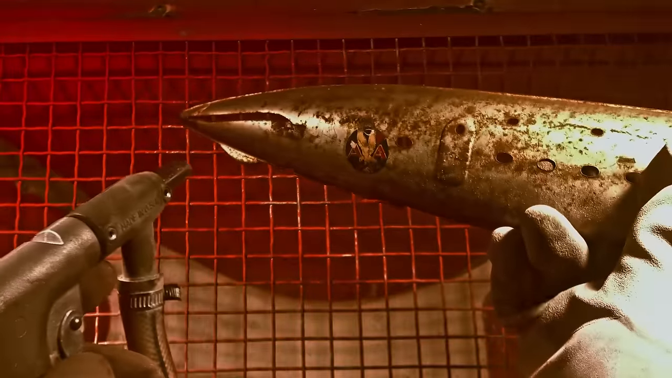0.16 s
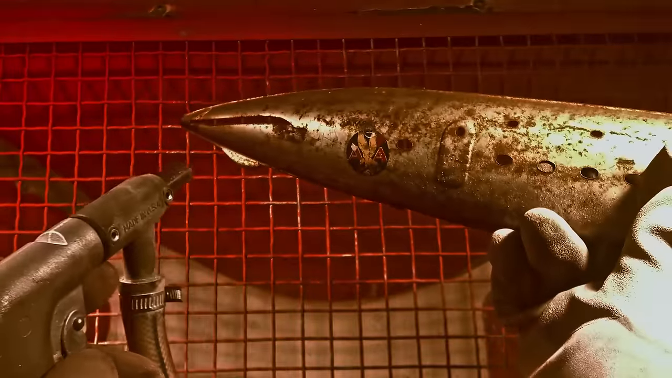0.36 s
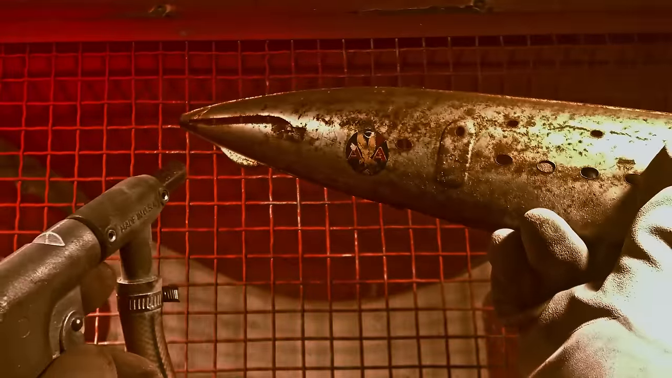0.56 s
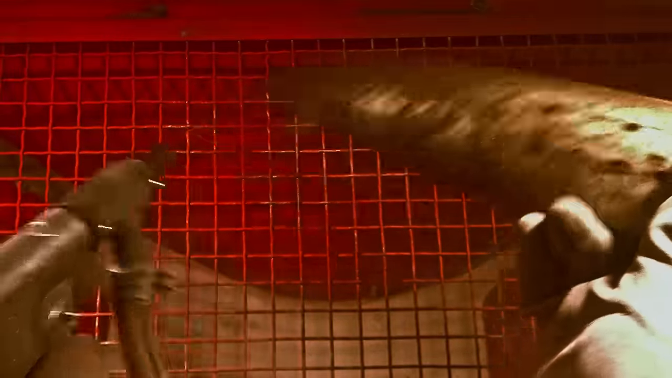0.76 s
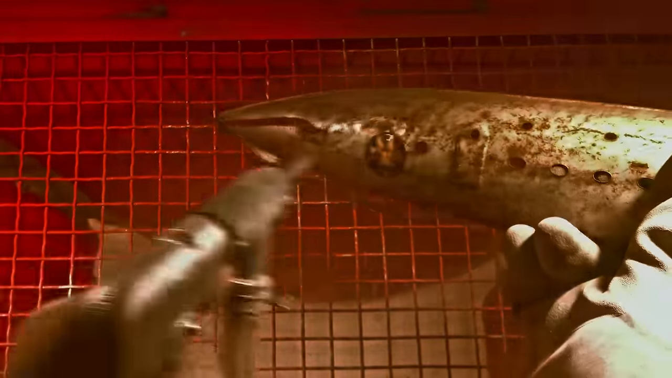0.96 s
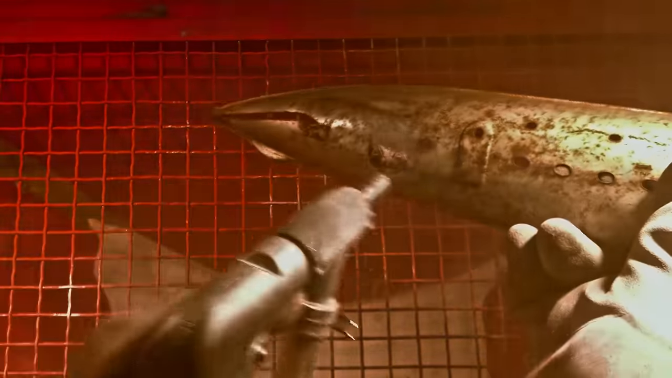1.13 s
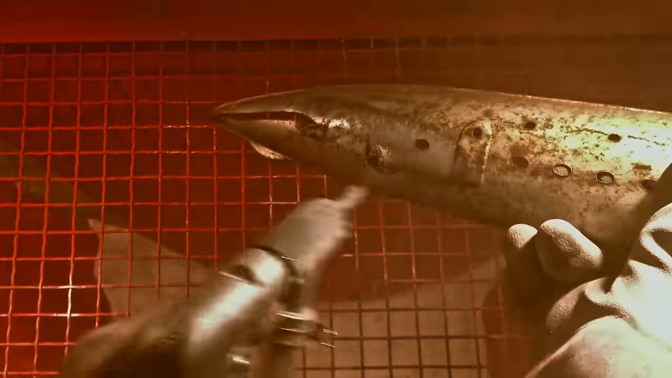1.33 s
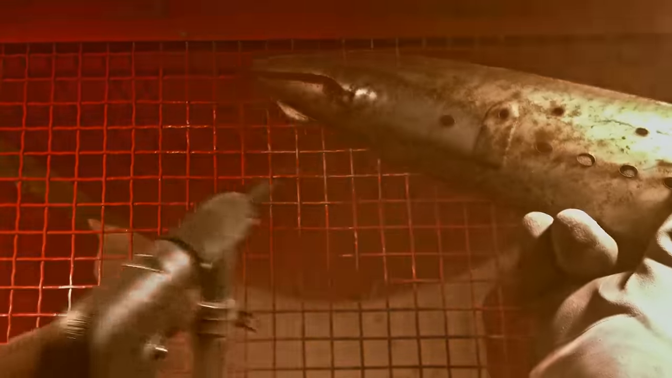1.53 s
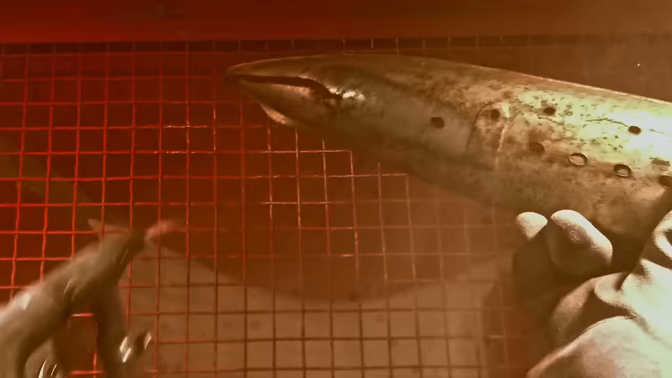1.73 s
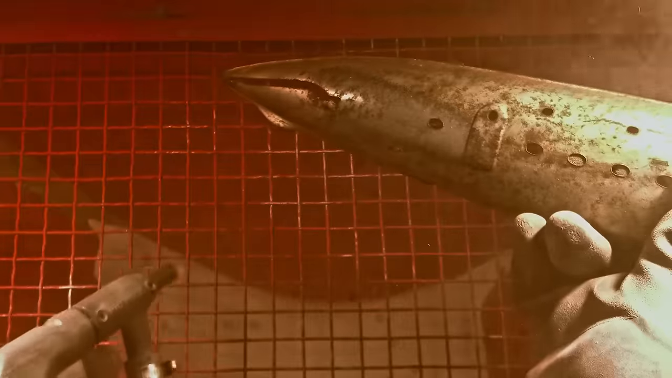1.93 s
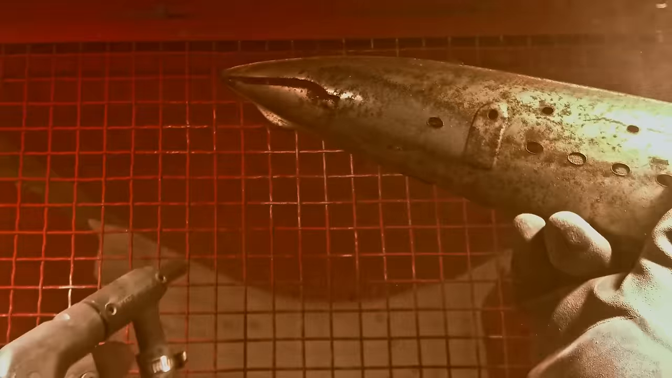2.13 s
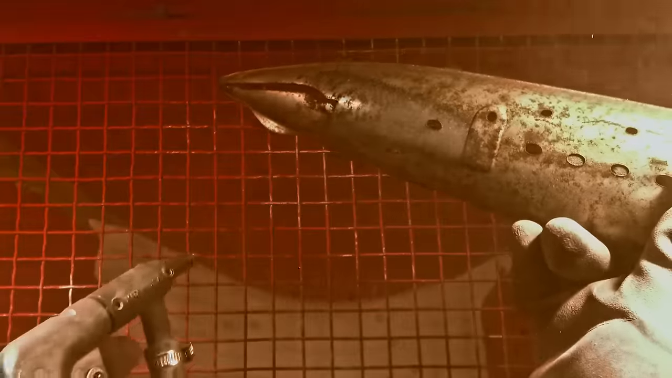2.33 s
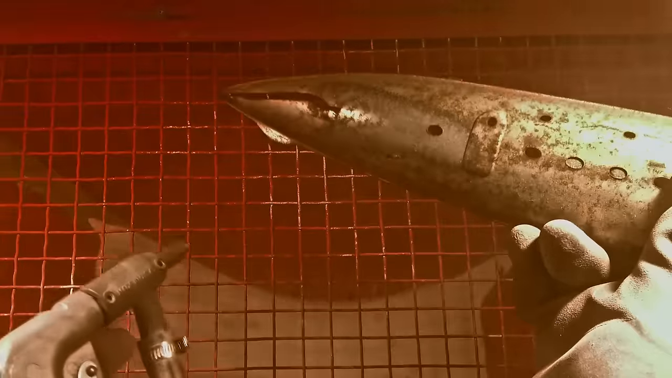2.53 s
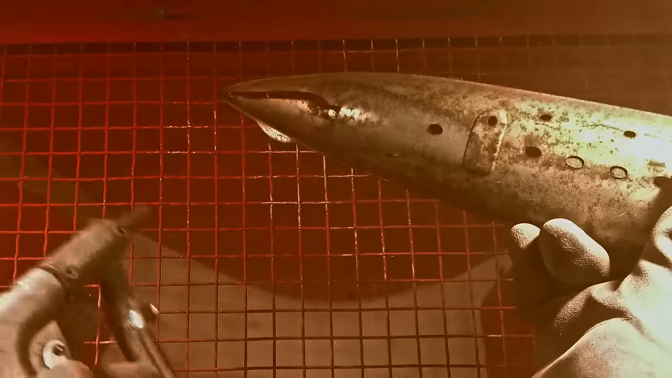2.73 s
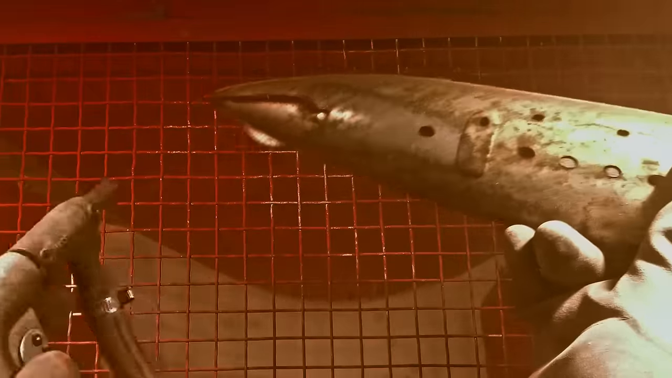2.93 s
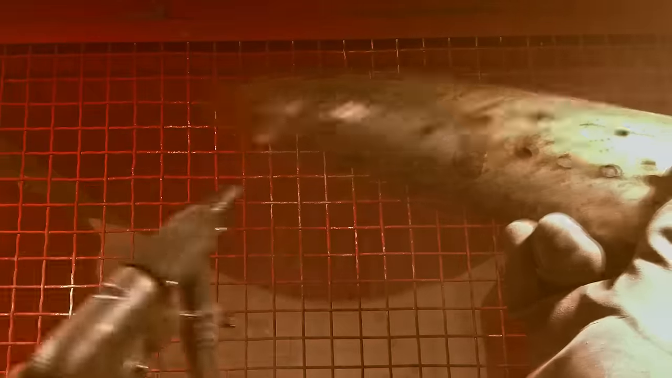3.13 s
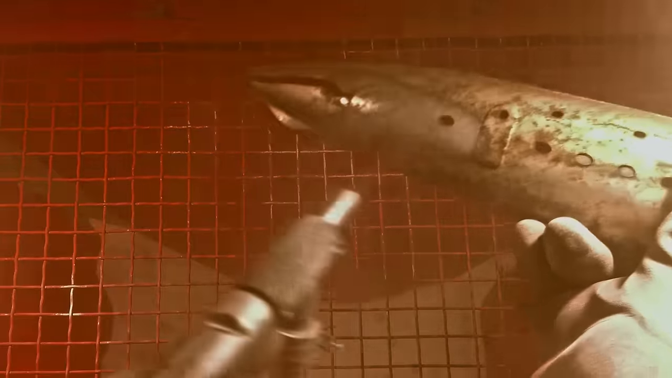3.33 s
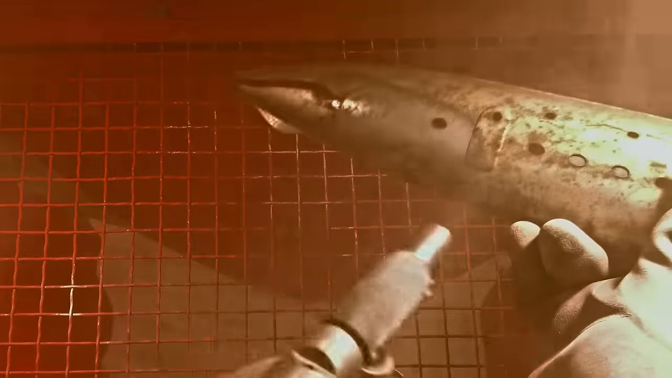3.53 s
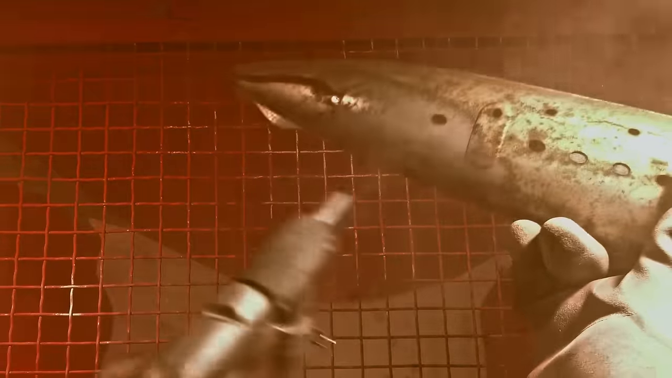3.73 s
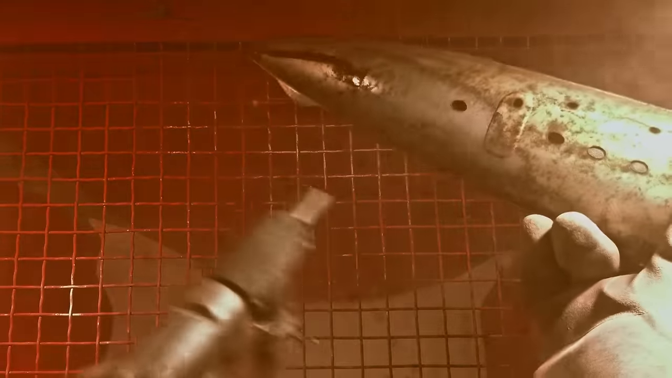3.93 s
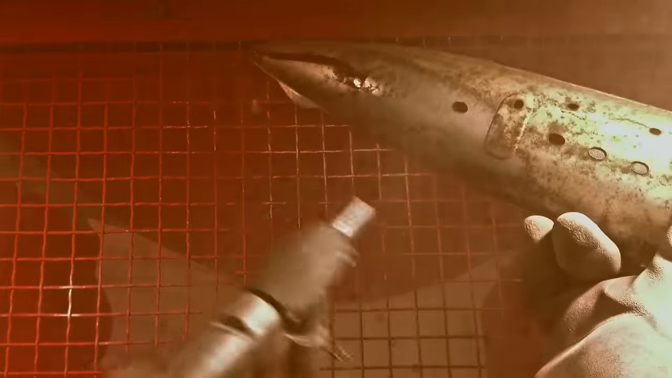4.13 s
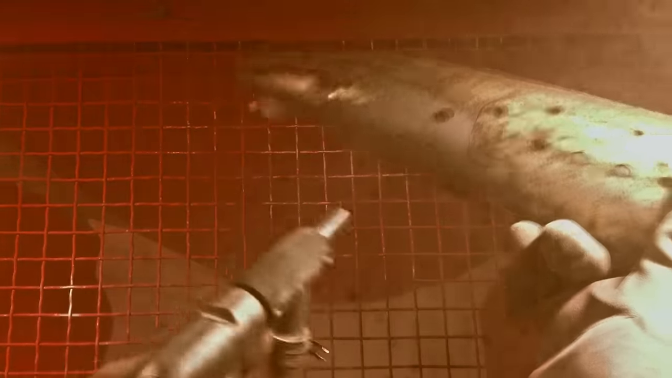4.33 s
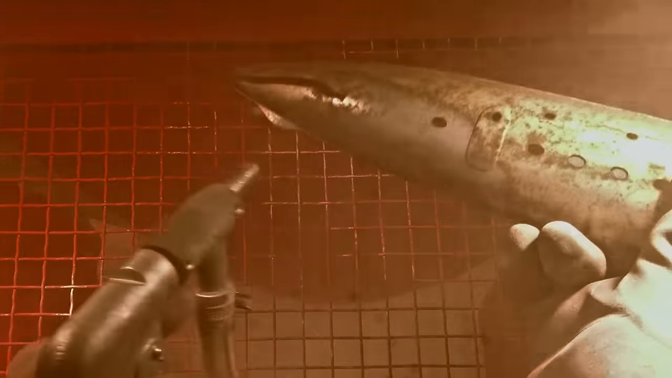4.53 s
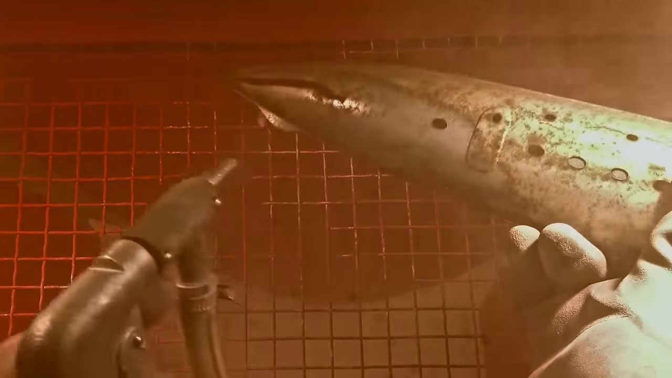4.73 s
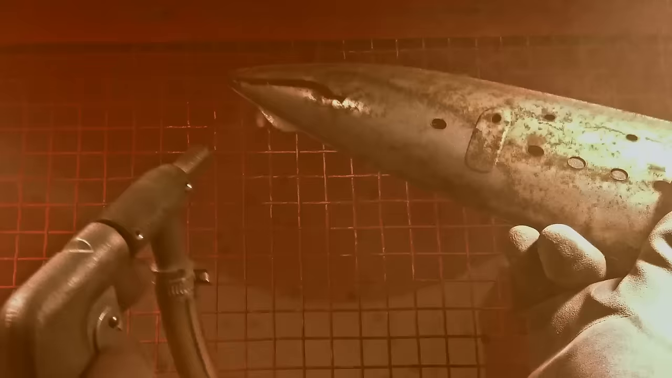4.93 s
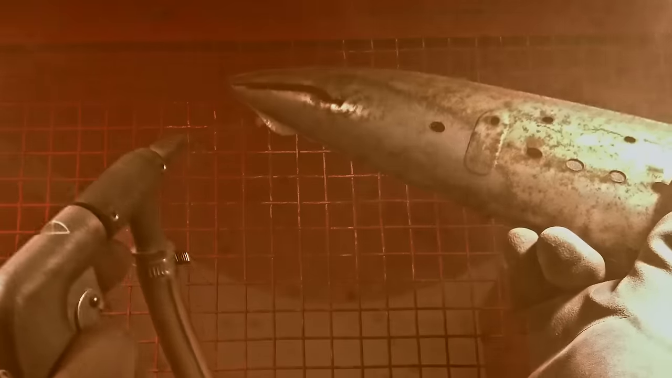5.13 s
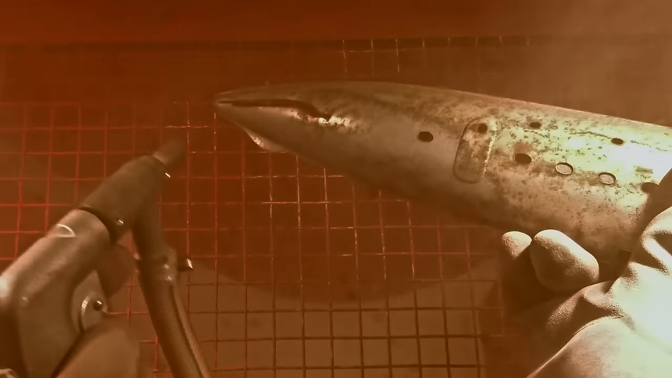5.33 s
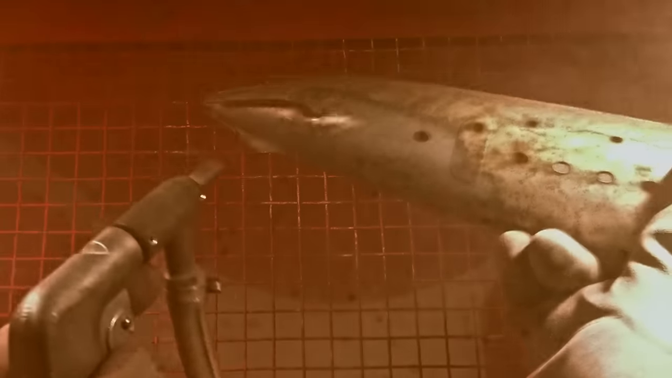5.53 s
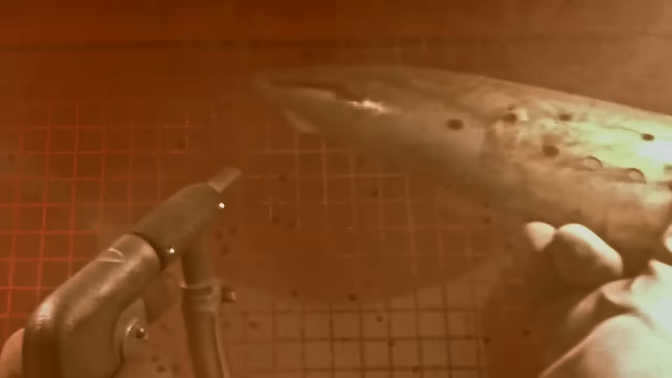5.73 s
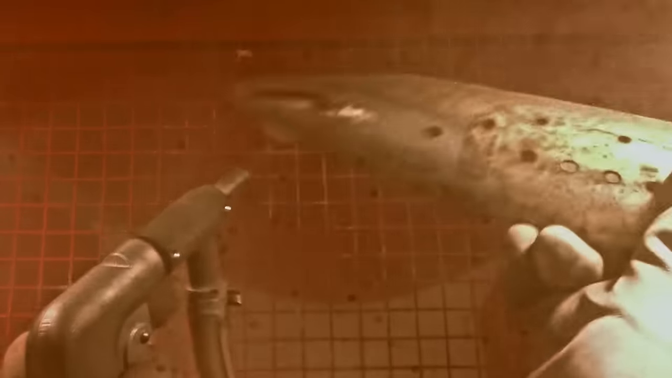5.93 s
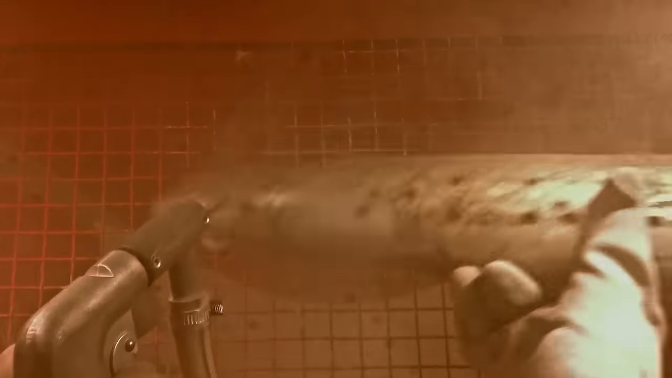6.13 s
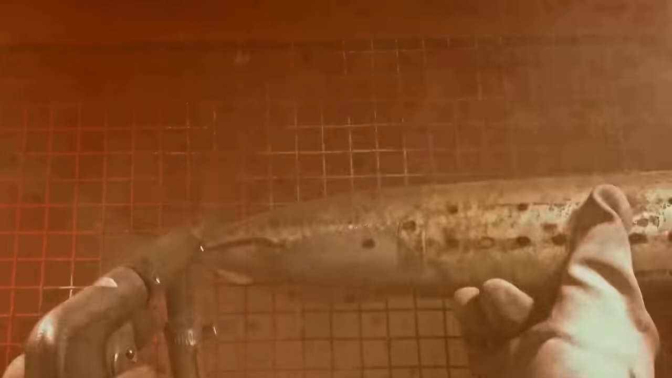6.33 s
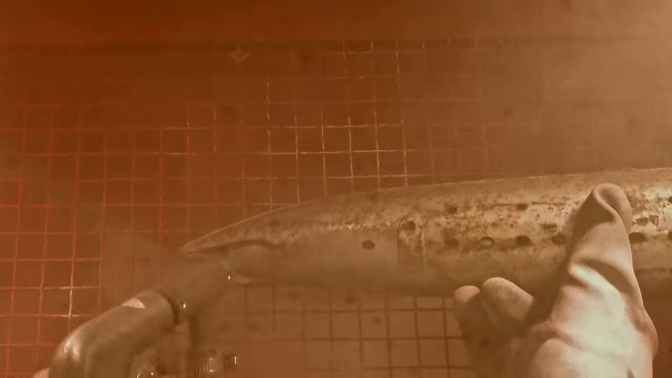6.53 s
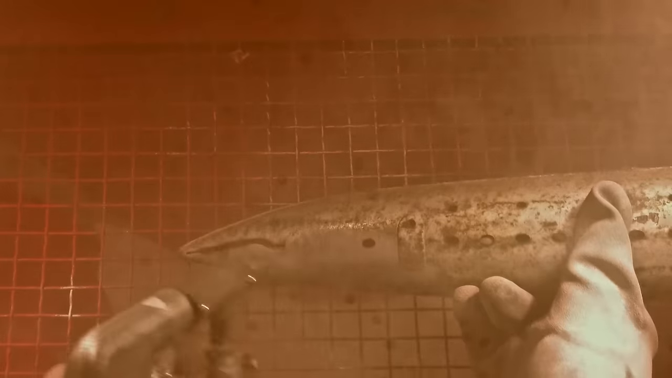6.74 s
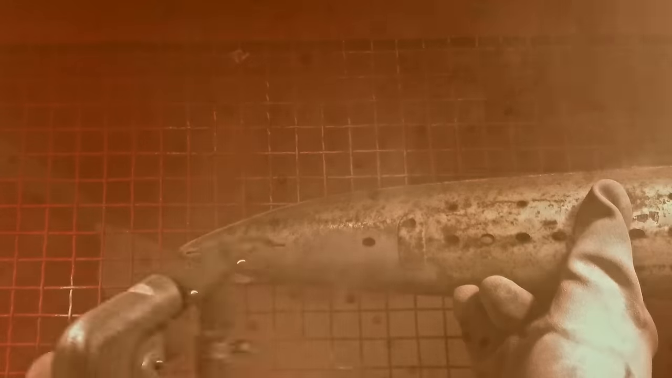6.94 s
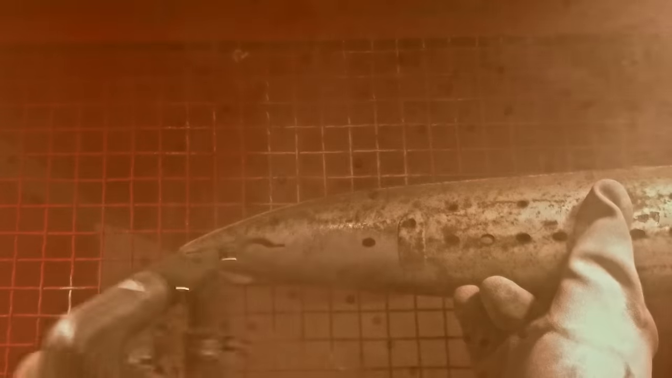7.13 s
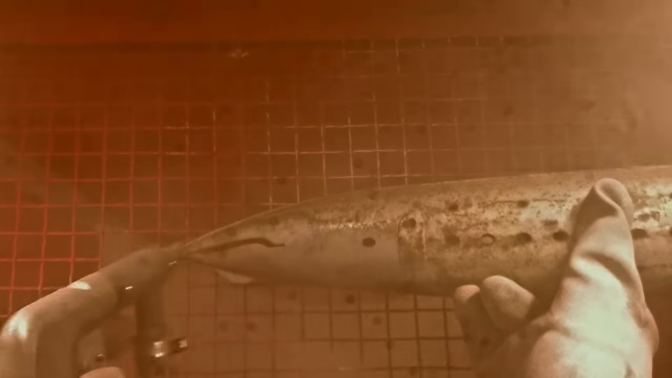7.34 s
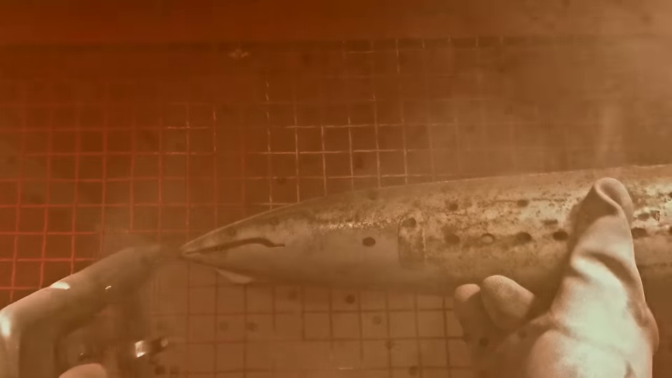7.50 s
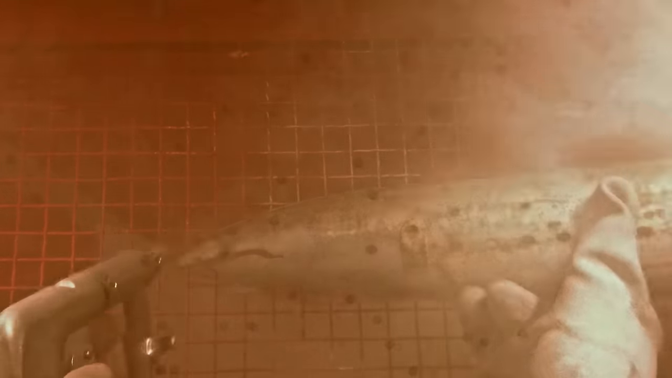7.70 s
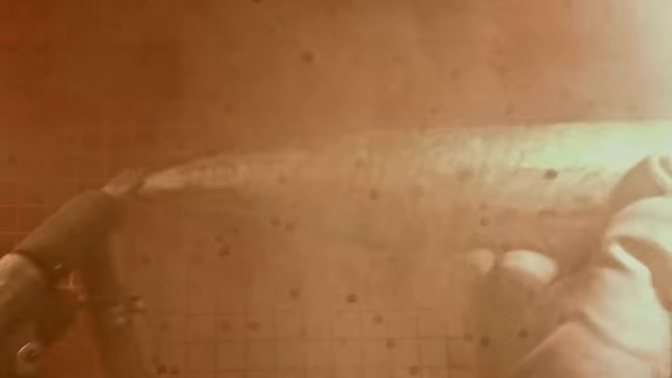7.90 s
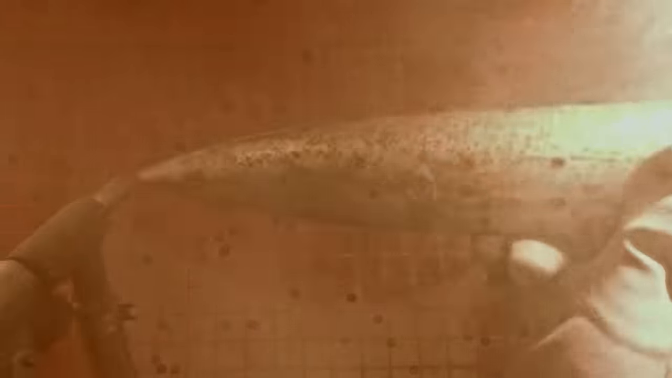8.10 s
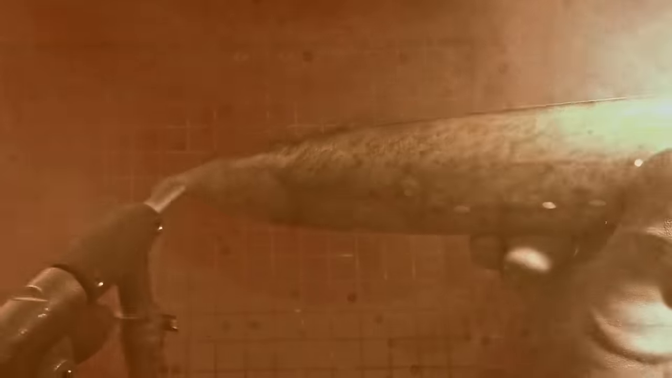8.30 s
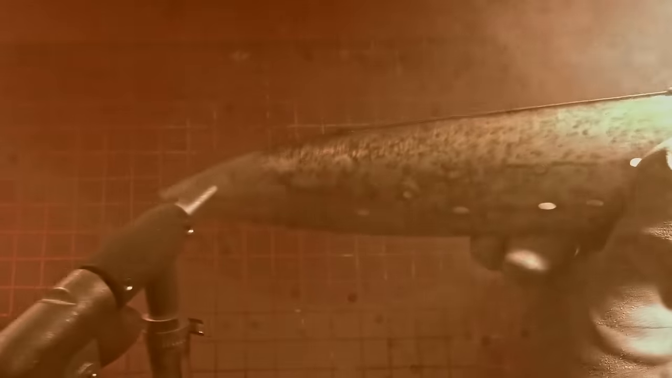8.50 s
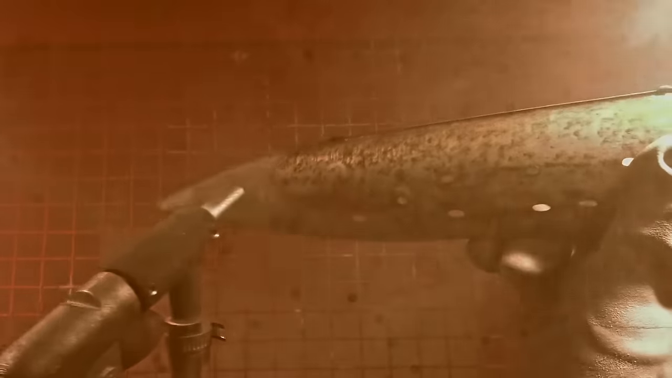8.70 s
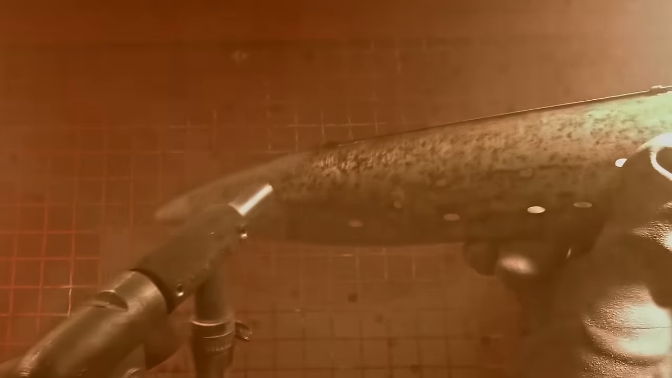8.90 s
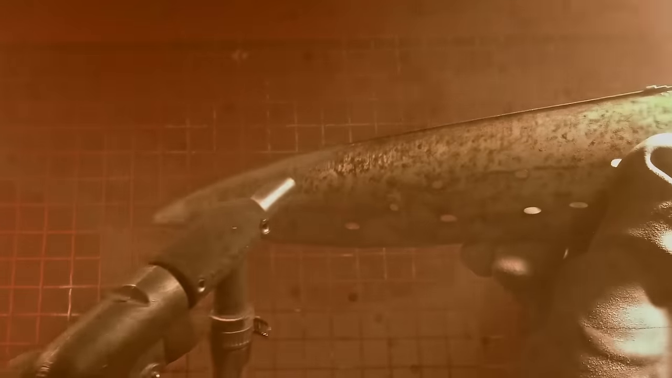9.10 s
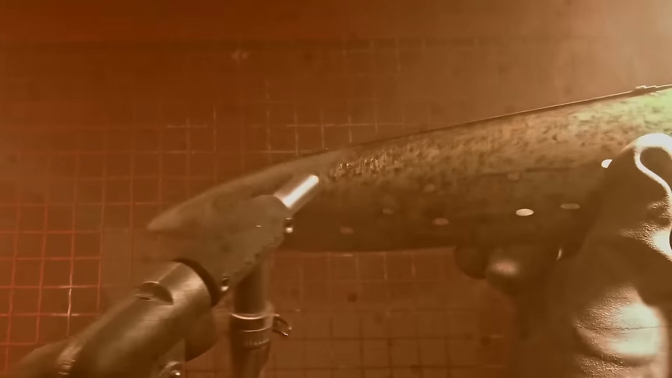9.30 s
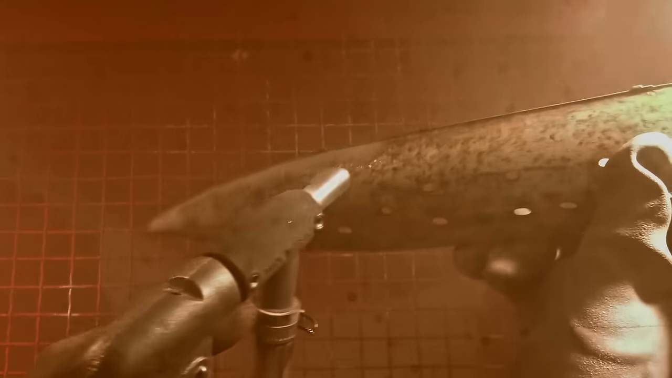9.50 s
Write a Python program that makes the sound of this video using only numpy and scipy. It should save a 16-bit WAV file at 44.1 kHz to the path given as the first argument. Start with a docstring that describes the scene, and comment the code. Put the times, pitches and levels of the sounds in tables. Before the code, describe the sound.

Close inside a closed steel blasting cabinet, with a faint steady hiss and a very low-level shop drone. At 0.1 s there is a soft dull knock, then slight glove rubbing and rustles. At 0.7 s a sandblasting gun opens abruptly with a low air push: loud, bright hiss, sizzling grit, midrange roar and a breathy edge tone, strongest at 1.2 s. It shuts off at about 1.65 s with a short trailing trickle. Near 1.9 s comes a firmer dull knock with glove rub, then a tiny tap and faint rustles. At 2.95 s the gun fires again and continues to the end, about 9.7 s. Until 5.5 s it roars and sings on the metal, with hollow booms; afterwards the roar thins and hiss dominates, with spitting surges around 5.6-7.6 s, low buffets and booms near 5.8 and 8 s, and strong, steadier hiss after 8.25 s.

```python
"""Knocks and rubbing gloves in a closed steel cabinet, over a background hiss and a shop drone, come first.
At 0.7 s a sandblasting gun fires for about a second; knocks and rubbing return; from 2.9 s it fires to the end.
Each blast is shaped noise: nozzle hiss, sizzling random grit, a roar and an edge tone of shifting colour.
Noise-driven resonances ring the panels and boom the air of the box; gusts and low eddies buffet the microphone.
Knocks are decaying sines with a noise clack; rubs, rustles, background hiss and draught are filtered noise."""
import sys
import numpy as np
from scipy import signal
from scipy.fft import rfft, irfft, next_fast_len
from scipy.io import wavfile
from scipy.ndimage import map_coordinates

SR = 44100
rng = np.random.default_rng(int(sys.argv[2]) if len(sys.argv) > 2 else 0)


def dump_mix(stems):
    """Bounce the given channels to the path in sys.argv[1] as a 16-bit WAV at rate SR."""
    frames = np.atleast_2d(stems).T  # one column per channel
    limited = np.clip(frames, -1, 1)  # hard clip at full scale
    pcm = np.round(limited * 32767).astype(np.int16)
    wavfile.write(sys.argv[1], SR, pcm)


N = 426006
T = np.arange(N) / SR  # time/s
TOP_HZ = 15730  # upper band limit

# Trigger of the gun: pull t/s, release t/s (the last lies past the end)
TRIGGER = [(0.708, 1.645), (2.948, 9.7)]

# Noise spectra, each scaled to rms 1 in use: f/Hz, relative level/dB per Hz
BACKGROUND_SPECTRUM = [(150, -13.5), (300, -7), (520, -19), (1100, -8.5), (1900, -15.5), (3000, -13.5),
                       (4300, -11), (4900, -16.5), (8500, -13), (9500, -6.5), (12000, -12), (13300, -3.5),
                       (15500, -5)]
GLOVE_SPECTRUM = [(150, -17), (300, 5.5), (500, -5), (800, -2), (1050, -9), (1350, -5), (1550, -7),
                  (1750, -10), (2100, -19), (6000, -27)]
CLACK_SPECTRUM = [(400, 0), (1100, 0), (2100, -2), (3200, -18), (8000, -40)]
RUMBLE_SPECTRUM = [(15, -5), (30, -4), (65, -2), (110, -5), (200, -16.5), (500, -33.5), (2000, -87)]
GUST_SPECTRUM = [(60, -13), (150, 1.5), (350, 3), (650, 3), (1000, -0.5), (2000, -4), (6000, -49)]
EDGE_SPECTRUM = [(1300, -38.5), (2100, -12), (2350, -7.5), (2550, -4), (2700, -2.5), (2850, -3.5),
                 (2980, -1.5), (3170, -1.5), (3350, -4.5), (3550, -9), (4300, -15)]
ROAR_SPECTRUM = [(100, -37), (200, -17), (350, -1.5), (520, -11.5), (680, -6.5), (950, -2), (1350, 0.5),
                 (1750, 3), (2300, -3.5), (2800, -1.5), (4000, -4), (9000, -53)]
HISS_SPECTRUM = [(5000, -40), (8000, -14), (8800, -6), (9350, -1), (10300, -3.3), (10900, -2.2),
                 (11700, -6), (12500, -5), (13400, -1.8), (14700, 0), (15700, -1.8)]
SPRAY_SPECTRUM = [(1500, -20), (3000, -13), (3450, -15), (3850, -12.5), (4400, -3), (5000, -4.5),
                  (6100, 1.65), (6900, -1.5), (7600, 2.8), (8500, -3), (9500, -21), (14000, -33)]

# Resonances of the shop, the steel panels and the air in the box: f/Hz, nominal width/Hz, mean level/dB
SHOP_MODES = [(350, 60, -4), (700, 90, 0), (830, 80, 0), (3850, 220, -8)]
PANEL_MODES = [(632, 45, -4), (740, 50, -6), (840, 35, -6), (1175, 40, -4), (1334, 32, 1), (1484, 50, 0),
               (1800, 90, -5), (2160, 100, -1), (2370, 30, 4)]
BOX_AIR_MODES = [(273, 28, 0), (350, 45, -12), (480, 40, -16)]

# Gloves shifting their grip on the part: t/s, level/dB before flutter, length/s
RUBS = [(0.19, -73, .11), (1.93, -70.5, 0.16)]
# Brief rustles and hisses: t/s, level/dB before a common lift, length/s, centre f/Hz, nominal width/Hz
RUSTLES = [(0.252, -79.5, 0.039, 1320, 110), (0.532, -84, 0.017, 1600, 700),
           (2.175, -83, 0.021, 6000, 4000), (2.513, -79, 0.021, 5900, 1100)]
# Dull knocks of the part and gun: t/s, peak level of the ring/dB
KNOCKS = [(0.095, -51.5), (1.873, -43), (2.105, -61.5)]
# Modes a knock rings with: f/Hz, relative level/dB before scatter, 60 dB decay time/s
KNOCK_MODES = [(365, -4, .09), (455, 0, .065), (560, -3, .035), (685, -7, .04), (860, -13, .03),
               (1140, -12, .03), (2020, -20, .04)]

# Air stirring at the microphone: t/s, level/dB before random swings
DRAUGHT = [(0, -69), (2.8, -72.5), (3.7, -80), (7.5, -75.5), (8.6, -68.5), (9.66, -67.5)]
# Eddies drifting over the microphone: t/s, level/dB, length/s
EDDIES = [(0.93, -55, 0.041), (1.81, -56.5, 0.14), (3.04, -65, .04), (4.48, -62, 0.022),
          (6.38, -56.5, 0.083), (8.1, -59, 0.13)]
# Pressure pushes of the jet: t/s, level/dB before a common lift and scatter, f/Hz before scatter
PUFFS = [(0.71, -40, 41.8), (1.642, -46, 60), (2.950, -41, 60), (3.293, -40.5, 73), (3.389, -44, 60),
         (5.646, -50, 70), (5.799, -38.5, 90), (5.921, -48, 81)]
# Low gusts as the deflected jet sweeps past: t/s, level/dB before a common lift and flutter, length/s
GUSTS = [(0.736, -54, 0.014), (0.926, -58, 0.028), (3.066, -55, 0.052), (3.44, -53.5, 0.049),
         (3.958, -60, .03), (5.526, -53, 0.023), (5.805, -58, 0.05), (6.44, -64.5, 0.26),
         (7.12, -63.5, 0.12), (7.944, -55.5, 0.085), (8.135, -52, 0.091)]

# How squarely the jet meets the part: t/s, roar level/dB, edge tone level/dB before trim (both before flutter)
AIM = [(0.72, -50, -44), (1.008, -45.0, -41.5), (1.205, -47, -48), (1.64, -48.5, -44), (2.95, -50.5, -54),
       (3.145, -52.5, -42.5), (3.345, -45.5, -43.5), (3.976, -47.5, -39.5), (4.471, -51.5, -43.5),
       (4.691, -50, -40.5), (5.051, -52.0, -42.0), (5.679, -60.5, -54), (6.155, -53.0, -51),
       (6.787, -58.0, -61.5), (7.642, -61, -53.5), (8.535, -61.5, -45), (9.053, -60, -58),
       (9.66, -58.5, -51)]
# The jet catching an edge and singing out: t/s, level/dB before trim and flutter, length/s
CATCHES = [(1.195, -35, 0.047), (1.388, -41.5, 0.022), (5.452, -42, 0.0091), (5.812, -43, 0.03),
           (6.135, -42.5, 0.081), (6.42, -43.0, 0.043), (7.015, -44.5, 0.04), (7.213, -43.5, 0.017),
           (8.717, -46, 0.16), (9.223, -43.5, 0.011), (9.537, -44, 0.097)]
# The air of the box booming up: t/s, level/dB before trim, length/s
BOOMS = [(0.913, -58, 0.02), (1.047, -57, 0.016), (1.484, -55, 0.058), (2.996, -49.5, 0.038),
         (3.084, -50.5, 0.043), (3.288, -57, 0.027), (3.429, -59.5, 0.05), (3.563, -58, 0.04),
         (3.716, -65, 0.037), (3.918, -54, 0.028), (4.254, -61, 0.025), (4.396, -53.5, 0.02),
         (6.198, -50, 0.031), (6.34, -64, 0.04), (7.941, -52, 0.034), (8.108, -49, 0.055),
         (8.365, -61.5, 0.056), (8.579, -64.0, 0.024)]

# Drift of the feed as the gun is moved: t/s, hiss level/dB before trim, spray level/dB (before surges, flutter)
FEED = [(0.72, -35.5, -46), (1.05, -38.5, -45.5), (1.64, -39.5, -46.0), (2.95, -34.5, -42.5),
        (3.352, -39, -47.0), (3.643, -35, -42), (4.542, -37, -45.5), (5.544, -32.5, -40),
        (6.043, -38.5, -45), (6.29, -38.5, -49), (6.793, -36, -48.5), (7.601, -37.5, -43.5),
        (7.971, -38.0, -48.5), (8.254, -33, -40.5), (9.66, -32, -40.5)]
# Short surges of the spitting feed: t/s, length/s, change of hiss/dB, change of spray/dB
SURGES = [(0.732, 0.024, 6, 6), (0.847, 0.021, 2.5, 5.5), (1.194, 0.03, 6, 8.5), (1.372, 0.026, 5, 6),
          (2.984, 0.022, 5.5, 3), (3.162, 0.022, 6, 7), (4.113, 0.027, 1.5, 5.5), (4.435, 0.022, 5, 5.5),
          (5.564, 0.02, 3.0, 0.5), (5.694, 0.016, 5, 4.5), (5.869, 0.026, 6, 3), (5.95, 0.032, 6.0, 4.0),
          (6.493, 0.042, 8.5, 11), (6.624, 0.043, 6.5, 6.5), (6.848, 0.022, 2.5, 2),
          (7.08, 0.032, 5.0, 4.5), (7.275, 0.047, 7, 7.5), (7.637, 0.03, 5, -2), (8.085, 0.03, 4, 4),
          (8.198, 0.017, 6, 6)]
# Balance of the blast between the sides: f/Hz, left minus right level/dB
SIDES = [(300, 1), (800, 2), (1400, -0.5), (3000, 0), (5000, -0.5), (6500, -2), (7700, -1.7), (9300, 1.2),
         (11000, 0), (13000, -3), (14500, 0), (15600, -3)]

BACKGROUND_DB = -68.5  # background hiss, away from its dip
DIP_DB, RISE_S = 2.5, 1.6  # its dip just after the first blast; time constant of the slow rise back
CLACK_DB, CLACK_T60_S = -11, .022  # contact noise relative to the ring of a knock; its 60 dB decay time
DRAUGHT_SWING_DB = 4  # scale of the draught's random swings
RUSH_DB = -68  # steady rush of air while the gun fires, before flutter
FULL_ROAR_DB = -48.5  # roar when the jet hits the part squarely
BOOM_DB, BOOM_GROWS = -69.5, 0.27  # steady boom under the full jet; dB of boom per dB of roar
HISS_TRIM_DB, EDGE_TRIM_DB, BOOMS_TRIM_DB = -.3, 1, 1  # mix of the blast's layers


def amp(db):
    """Level law: decibels to amplitude gain."""
    return np.exp(np.asarray(db) * (np.log(10) / 20))


def unit(x):
    """Normalisation of power: scale to rms 1."""
    return x / np.sqrt(np.mean(x ** 2) + 1e-20)


def curves(rows):
    """Linear interpolation: one value per sample for each column after the time."""
    times, *columns = np.transpose(rows)
    return [np.interp(T, times, column) for column in columns]


def wobble(rate):
    """Band-limited fluctuation: a smooth random curve with rate knots a second."""
    coarse = T[::64]
    knots = rng.standard_normal(int(N * rate / SR) + 4)
    return np.interp(T, coarse, map_coordinates(knots, [coarse * rate]))


def swell(s, db, length):
    """Gaussian envelope: a smooth rise and fall of gain around time s."""
    return amp(db) * np.exp(-.5 * np.minimum(np.abs(T - s) / length, 10) ** 2)


def swells(rows):
    """Incoherent addition: joint gain of (t/s, level/dB, length/s) swells, summed in power."""
    return np.sqrt(sum(swell(s, db, length) ** 2 for s, db, length in rows))


def valve(rise, t60):
    """Charge and discharge of a line: quick build-up at each pull (s), decay as the hose empties (s to -60 dB)."""
    flow = 0
    for pulled, released in TRIGGER:
        opening = np.clip((T - pulled) / rise, 0, 1) ** 1.45
        flow = flow + opening * amp(-60 * np.clip(T - released, 0, 2) / t60)
    return flow


def filtered(x, response):
    """Linear filtering: x times a response of frequency, zero-padded."""
    size = next_fast_len(N + SR // 2)
    return irfft(rfft(x, size) * response(np.fft.rfftfreq(size, 1 / SR)), size)[..., :N]


def coloured(x, spectrum):
    """Spectral shaping: x with an (f/Hz, level/dB) spectrum over log frequency, at rms 1."""
    f, db = np.transpose(spectrum)
    return unit(filtered(x, lambda hz: amp(np.interp(np.log(hz + 1), np.log(f), db))))


def resonant(x, hz, width):
    """Resonance: x through two equal peak filters, for steep sides, at rms 1."""
    section = np.concatenate(signal.iirpeak(hz, hz / (width * np.sqrt(2)), fs=SR))
    return unit(signal.sosfilt([section, section], x))


def air():
    """Diffuse turbulence: white noise, unrelated on the two sides of the closed box."""
    return rng.standard_normal((2, N))


def grit(rate, spread_db):
    """Random impacts: grains of uneven size strike independently, rate a second."""
    hits = rng.random((2, N)) < rate / SR
    signs = np.sign(air())
    return unit(hits * signs * amp(spread_db * np.clip(air(), -2, 2)))


def patchy(cell_hz, rate, depth_db):
    """Non-stationary noise: its colour shifts at random in smooth patches of time and frequency."""
    hz, t, z = signal.stft(air(), SR, nperseg=2048)
    knots = rng.standard_normal((int(t[-1] * rate) + 4, int(hz[-1] / cell_hz) + 4))
    field = map_coordinates(knots, np.meshgrid(t * rate, hz / cell_hz), order=2)
    return signal.istft(z * amp(depth_db * field), nperseg=2048)[1][:, :N]


def ringing(modes, rate, wander_db):
    """Modal superposition: turbulence drives resonances that swell and fade independently, at rms 1."""
    total = 0
    for hz, width, db in modes:
        gain = amp(db + wander_db * wobble(rate)) * np.sqrt(width)
        total = total + gain * resonant(air(), hz, width)
    return unit(total)


def workshop():
    """Stationary noise and resonance: a hiss that dips after the first blast and slowly rises back, and a drone."""
    since = T - TRIGGER[0][1]
    dip_db = DIP_DB * (since > 0) * np.exp(-np.abs(since) / RISE_S)
    background_hiss = amp(BACKGROUND_DB - dip_db) * coloured(air(), BACKGROUND_SPECTRUM)
    drone = ringing(SHOP_MODES, rate=5.8, wander_db=2.5)
    return background_hiss + amp(-84.0) * drone


def rubbing():
    """Friction noise: gloves rub with a broad spectrum and rustle in narrow bands."""
    sound = swells(RUBS) * amp(1.3 * wobble(29.7)) * coloured(air(), GLOVE_SPECTRUM)
    friction = air()
    for s, db, length, hz, width in RUSTLES:
        sound += swell(s, db + 5.5, length) * resonant(friction, hz, width)
    return sound


def knocking():
    """Damped free vibration: the hand-held part rings briefly, with a contact clack."""
    sound = np.zeros((2, N))
    t = np.arange(SR // 4) / SR
    contact = coloured(air(), CLACK_SPECTRUM)
    for s, db in KNOCKS:
        ring = 0
        for hz, level, t60 in KNOCK_MODES:
            decay = amp(level + rng.normal(0, 2.6, (2, 1)) - 60 * t / t60)
            phase = 0.45 * rng.random((2, 1))  # cycles
            ring = ring + decay * np.sin(2 * np.pi * (hz * t + phase))
        ring = ring * (1 - np.exp(-t / 0.0022))  # a padded contact starts softly
        start = round(s * SR)
        clack = amp(CLACK_DB - 60 * t / CLACK_T60_S) * contact[:, start:][:, :len(t)]
        sound[:, start:][:, :len(t)] += amp(db) * (ring / np.abs(ring).max() + clack)
    return sound


def buffets():
    """Flow-induced pressure: eddies and single damped pushes reach the microphone."""
    draught_db, = curves(DRAUGHT)
    draught = np.hypot(amp(draught_db + DRAUGHT_SWING_DB * wobble(11)), swells(EDDIES))
    sound = draught * coloured(air(), RUMBLE_SPECTRUM)
    t = np.arange(SR // 4) / SR
    for s, db, hz in PUFFS:
        # a push, then the air swings back, unlike on each side
        side_hz = hz * np.exp(.22 * rng.standard_normal((2, 1)))
        push = -amp(db + 2.5 - 60 * t / 0.081) * np.sin(2 * np.pi * side_hz * t)
        side_gain = amp(3.4 * rng.standard_normal((2, 1)))
        sound[:, round(s * SR):][:, :len(t)] += side_gain * push
    return sound


def gusts():
    """Broadband flow noise: air thrown back by the part rushes over the gloves and the cabinet floor."""
    strength = np.hypot(amp(RUSH_DB) * valve(rise=.02, t60=0.44), amp(1.5) * swells(GUSTS))
    flutter = amp(1.5 * wobble(40) + 1.4 * wobble(12))
    return strength * flutter * coloured(air(), GUST_SPECTRUM)


def impact():
    """Jet impingement: the jet sings on edges, roars, and excites the steel panels and the air of the box."""
    roar_db, edge_db = curves(AIM)
    swirl_db = 1.1 * wobble(25)
    singing = np.hypot(amp(edge_db), swells(CATCHES))
    edge_noise = coloured(patchy(cell_hz=80.15, rate=18, depth_db=4.0), EDGE_SPECTRUM)
    edge = singing * amp(EDGE_TRIM_DB + swirl_db) * edge_noise

    eddies = coloured(patchy(cell_hz=90.1, rate=19, depth_db=5.0), ROAR_SPECTRUM)
    panels = ringing(PANEL_MODES, rate=13, wander_db=5.0)
    # the panels ring out fully only under the full jet
    hard_hit = np.clip(amp(roar_db - FULL_ROAR_DB), 0, 1) * valve(rise=.017, t60=0.69)
    roar = amp(roar_db + swirl_db) * (0.9 * eddies + 0.68 * hard_hit * panels)

    steady_boom = amp(BOOM_DB + BOOM_GROWS * (roar_db - FULL_ROAR_DB))
    stirring = np.hypot(steady_boom, amp(BOOMS_TRIM_DB) * swells(BOOMS))
    boom = stirring * ringing(BOX_AIR_MODES, rate=7.8, wander_db=1.6)

    # a last trickle of air outlasts the release
    flow = 0.93 * valve(rise=0.017, t60=0.31) + 0.12 * valve(rise=.016, t60=1.24)
    return (edge + roar + boom) * flow


def nozzle():
    """Turbulent jet and particle noise: hiss and sizzling grit surge and flutter with the uneven feed."""
    hiss_db, spray_db = curves(FEED)
    for s, length, hiss_change_db, spray_change_db in SURGES:
        surge = swell(s, 0, length)
        hiss_db = hiss_db + hiss_change_db * surge
        spray_db = spray_db + spray_change_db * surge
    flutter_db = .6 * wobble(28) + 0.56 * wobble(130)
    jet = patchy(cell_hz=170, rate=14, depth_db=1.9) + 0.4 * grit(rate=4500, spread_db=0.5)
    rebound = patchy(cell_hz=150, rate=16, depth_db=3.0) + 0.5 * grit(rate=2300, spread_db=3.0)
    hiss = amp(hiss_db + flutter_db + HISS_TRIM_DB) * coloured(jet, HISS_SPECTRUM)
    spray = amp(spray_db + flutter_db) * coloured(rebound, SPRAY_SPECTRUM)
    return hiss * valve(rise=0.015, t60=0.082) + spray * valve(rise=0.015, t60=0.14)


def scene():
    """Superposition: the blasts, balanced between the sides by frequency, over the small sounds."""
    def lean(hz):
        """Interchannel level difference: half the balance to each side, with opposite sign."""
        return amp(np.interp(hz, *np.transpose(SIDES)) * np.array([[.5], [-.5]]))

    background = workshop() + rubbing() + knocking() + buffets()
    blast = gusts() + impact() + nozzle()
    return background + filtered(blast, lean)


def record(dry):
    """Band limitation: nothing at or above TOP_HZ is kept."""
    return filtered(dry, lambda hz: hz < TOP_HZ)


dry = scene()
out = record(dry)
dump_mix(out)
```